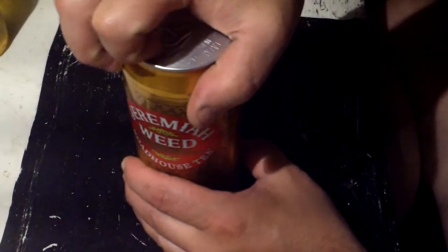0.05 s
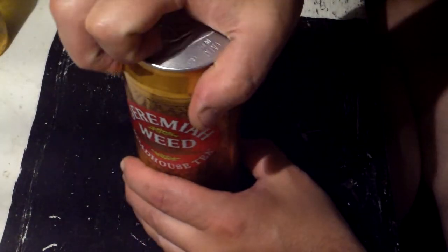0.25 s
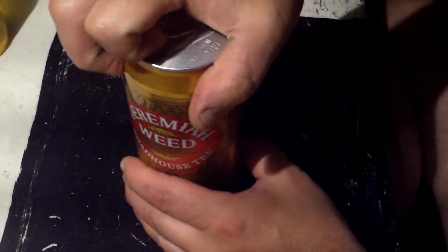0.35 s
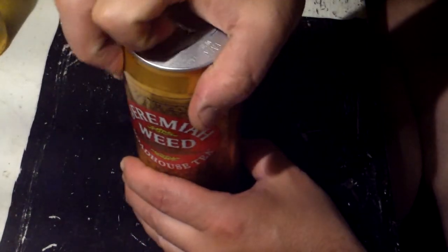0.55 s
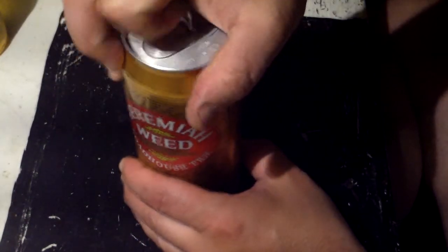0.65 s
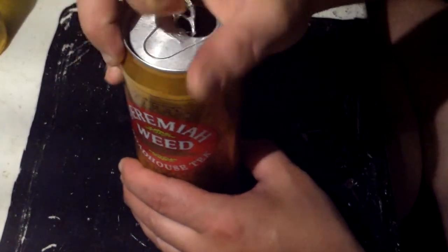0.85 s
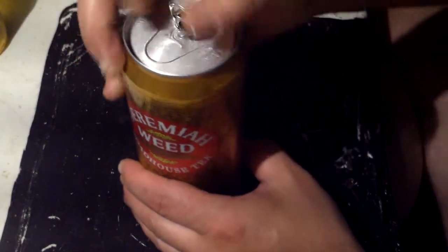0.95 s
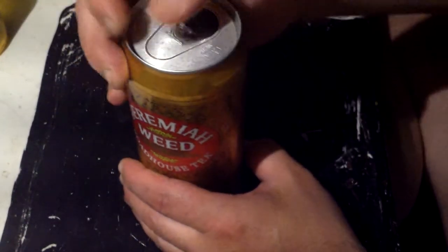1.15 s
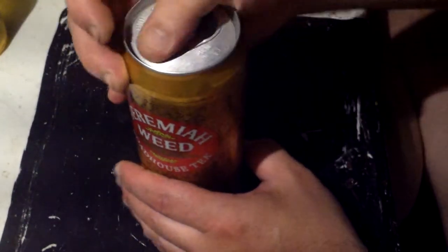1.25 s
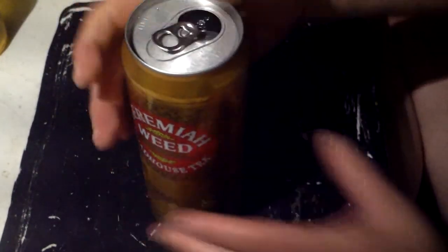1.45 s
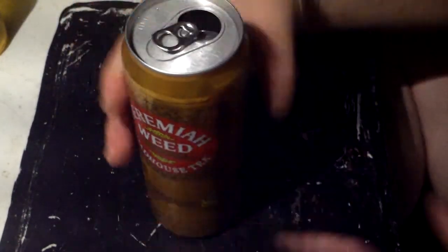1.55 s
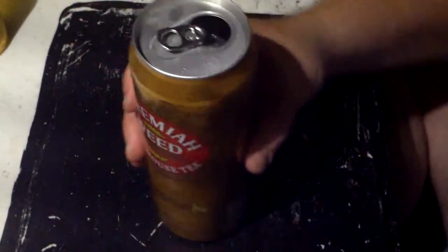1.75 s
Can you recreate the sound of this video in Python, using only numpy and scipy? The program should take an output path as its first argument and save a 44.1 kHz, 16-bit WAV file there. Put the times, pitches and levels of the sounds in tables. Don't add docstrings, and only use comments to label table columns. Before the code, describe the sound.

Drink can being cracked open up close, ring pull clicking, gas hissing briefly, low appliance hum behind

```python
import sys
import numpy as np
from scipy import signal
from scipy.fft import rfft, irfft
from scipy.io import wavfile
from scipy.ndimage import uniform_filter1d

SR = 44100
rng = np.random.default_rng(int(sys.argv[2]) if len(sys.argv) > 2 else 0)


def nominal_scale(level):
    x = np.asarray(level, float) / 20
    return 10 ** x


def file_out(sig):
    cols = np.atleast_2d(sig).T
    lim = np.clip(cols, -1, 1)
    pcm = np.round(lim * 32767).astype(np.int16)
    wavfile.write(sys.argv[1], SR, pcm)


N = 79380

# (frequency [Hz], level [dB], T60 [s])
WALL_MODES = [(6350, -36, .5), (7800, -43, .3)]


def curve(rows, axis=1):
    rows = np.array(rows)
    return np.interp(np.arange(N) / SR, rows[:, 0], rows[:, axis])


def unit(x):
    return x / np.sqrt(np.mean(x ** 2))


def shaped_noise(shape):
    return unit(irfft(rfft(rng.standard_normal(N)) * shape, N))


def bands(rows, sharp=0.94):
    f = np.fft.rfftfreq(N, 1 / SR) + 1
    out = 0
    for hz, width_hz, db in rows:
        detuning = (f - hz ** 2 / f) / width_hz
        out = out + nominal_scale(db) * shaped_noise((1 + detuning ** 2) ** (-sharp / 2))
    return out


def flicker(rate_hz, db):
    k = int(SR / rate_hz)
    wander = uniform_filter1d(uniform_filter1d(rng.standard_normal(N), k), k)
    return nominal_scale(db * unit(wander))


def add(out, s, x):
    i = int(s * SR)
    out[i:i + len(x)] += x[:N - i]


def highpass(x, low_hz):
    return signal.sosfilt(signal.butter(2, low_hz, "high", fs=SR, output="sos"), x)


def strike(blows, modes, low_hz, top_hz=8000, shimmer_db=-20):
    twins, spread_db, detune, phase_spread_rad = 3, 1.5, 0.012, 0.8
    rise_s, snap_s, shimmer_t60_s = 0.00061, 0.00035, 0.09
    out = np.zeros(N)
    t = np.arange(SR // 3) / SR
    hz, db, t60_s = np.repeat(np.array(modes), twins, axis=0).T[:, :, None]
    octaves = np.log2(hz / 4000)
    shimmer_filter = signal.butter(2, (4970, 9000), "band", fs=SR)
    for s, peak_db, tilt_db, snap_db, ring in blows:
        r = rng.standard_normal((3, len(hz), 1))
        tilt = tilt_db * np.minimum(octaves, 0) - max(tilt_db, 0) * np.maximum(octaves, 0)
        gain = nominal_scale(db + tilt + spread_db * r[0])
        mode_hz = hz * (1 + detune * np.minimum(0.118 / t60_s, 1) * r[1])
        phase = 2 * np.pi * mode_hz * t + phase_spread_rad * r[2]
        body = np.sum(gain * np.sin(phase) * 1000. ** (-t / (t60_s * ring)), axis=0)
        swell_s = rise_s * np.clip(-snap_db / 20, .1, 2)
        body = body * np.sin(np.pi / 2 * np.minimum(t / swell_s, 1)) ** 2
        snap_hz = top_hz * nominal_scale(min(tilt_db + 6.5, 0) * 2)
        burst = rng.standard_normal(len(t)) * np.exp(-t / snap_s)
        snap = signal.lfilter(*signal.butter(3, snap_hz, fs=SR), burst)
        shimmer = signal.lfilter(*shimmer_filter, rng.standard_normal(len(t)))
        shimmer = shimmer * 1000. ** (-t / shimmer_t60_s)
        edge = snap / np.max(np.abs(snap)) + nominal_scale(shimmer_db) * shimmer
        add(out, s, nominal_scale(peak_db) * (body / np.max(np.abs(body)) + nominal_scale(snap_db) * edge))
    return highpass(out, low_hz)


def rumble():
    # (frequency [Hz], level [dB per Hz])
    spectrum = [(12, -46), (20, 8), (54, -1.5), (81, -11), (156, -7), (418, -7), (623, -10), (908, -15.5),
                (3000, -22.5), (3900, -70), (6600, -120)]
    f, rows = np.fft.rfftfreq(N, 1 / SR) + 1, np.array(spectrum)
    shape = nominal_scale(np.interp(np.log(f), np.log(rows[:, 0]), rows[:, 1])) / (1 + (f / 3200) ** 8)
    return nominal_scale(-44) * shaped_noise(shape) * flicker(14, 1.5)


def hum():
    # (frequency [Hz], width [Hz], level [dB rms])
    bed = [(64, 42, -53), (118, 15.7, -46.5), (172.8, 4.7, -50), (228, 2.2, -55.5), (590, 100, -53.5)]
    # (frequency [Hz], level [dB])
    lines = [(58.6, -43.5), (108.5, -48), (162, -51.5)]
    t = np.arange(N) / SR
    out = bands(bed)
    for hz, db in lines:
        drift_rad = np.log(flicker(2.4, 19.0))
        out = out + nominal_scale(db - 2.0) * flicker(16.0, 1.8) * np.sin(2 * np.pi * hz * t + drift_rad)
    return out


def whirr():
    # (frequency [Hz], width [Hz], level [dB rms])
    whirr_bands = [(1510, 2200, -54), (3050, 1180, -55.5), (3750, 760, -53), (4280, 670, -48.5),
                   (6310, 260, -70.5), (8100, 400, -74)]
    return bands(whirr_bands, sharp=2.2) * flicker(21.0, 0.61)


def floor():
    # (time [s], recorder gain [dB], whirr level [dB])
    ducking = [(0, -0.5, 0), (.1, -0.5, -0.5), (.225, 0.5, -3), (.235, -8.5, -21), (.35, -9.5, -9.5),
               (.37, -10.5, -10), (.47, -8.5, -9), (.5, -15, -35), (.64, -19.5, -15.5), (.82, -12, -8.5),
               (.9, -20, -10.5), (1.0, -11, -6), (1.2, -6, -10.5), (1.3, -10, -10.5), (1.42, -4, -4),
               (1.57, 1, -1.5), (1.68, 0.5, 1), (1.8, 1, 0.5)]
    gain_db = curve(ducking)
    whirr_db = curve(ducking, axis=2)
    hiss = rng.standard_normal(N) * nominal_scale(-68 + 0.14 * gain_db)
    return (rumble() + hum()) * nominal_scale(gain_db) + whirr() * nominal_scale(whirr_db) + hiss


def ticks():
    slips = [
        (.2268, -10, 0.5, -22, 0.66),
        (.2755, -24, 4, -43, 0.86),
        (.321, -39, -1.5, -46, .7),
        (.3597, -13.5, 6.5, -21, 0.99),
        (.4340, -24, -1, -49, 1),
        (.4400, -24, 0, -44, 1.2),
    ]
    sealed_lid = [(1920, -0.5, 0.027), (1930, -9, 0.015), (2464, -3.5, 0.018), (2770, 4.5, 0.0044),
                  (3620, 10, 0.022), (3950, 1, 0.027), (4430, -4, 0.024), (4670, -8, 0.029),
                  (5020, -14.5, 0.045), (6470, -16.5, 0.027), (7920, -22, 0.015)]
    return strike(slips, sealed_lid, low_hz=1430)


def pierce():
    breach = [(.4745, -10.5, 0, -11, 0.82)]
    vented_lid = [(1970, -3.5, 0.024), (2290, -1, 0.009), (3080, -16, 0.014), (3630, 5.5, 0.008),
                  (4050, 2, 0.017), (4740, -2.5, 0.0098), (5340, -6.5, .01), (6100, -17, .02),
                  (8040, -17, .008)]
    return strike(breach, vented_lid, low_hz=1530, top_hz=12000, shimmer_db=-30)


def vent():
    # (time [s], level [dB])
    flow = [(.484, -72), (.497, -48), (.51, -38.5), (.522, -38), (.55, -39), (.572, -43.5), (.59, -51.5),
            (.603, -66), (.62, -82)]
    # (frequency [Hz], width [Hz], level [dB])
    jet = [(1840, 280, -30), (2800, 320, -15), (4210, 1440, 4.5), (6340, 1300, -15), (8000, 620, -9),
           (10370, 1800, 1), (12300, 1500, -7), (14300, 1700, -5)]
    t = np.arange(N) / SR
    on = (t > flow[0][0]) & (t < flow[-1][0])
    return on * unit(bands(jet, sharp=2.17)) * nominal_scale(curve(flow) + 4) * flicker(150, 1)


def pop():
    relaxing = [(.5388, -13, 0, -11.5, 0.97)]
    dome = [(1848, 6.5, 0.02), (1470, -5, 0.014), (1170, -24, .01), (2560, 0.5, 0.015), (3800, 3.5, 0.0065)]
    return strike(relaxing, dome, low_hz=614, top_hz=3600, shimmer_db=-40)


def first_break():
    fracture = [(.6879, -8, 0, -5.5, 1)]
    bent_lid = [(1520, -43, .006), (2070, -6.5, 0.013), (3010, -5.5, 0.04), (3370, 8, 0.0092),
                (3930, 1, 0.015), (4587, -3.5, 0.034), (5560, -19, 0.028), (6500, -14, 0.0053),
                (7200, -22, 0.009), (7950, -35, 0.014), (9020, -12.5, 0.0086)]
    return strike(fracture, bent_lid, low_hz=750, top_hz=5400, shimmer_db=-29)


def rips():
    steps = [(.7972, -46, 4, -33, .3), (.7996, -26, 8, -24, 0.22), (.8025, -21, 4.1, -13, 0.29),
             (.8040, -20, 4.5, -23, 0.56), (.8103, -21, 11, -32, 0.29), (.8156, -4.5, 3.5, -15, 0.4),
             (.8176, -13, 6, -36, 0.36), (.8190, -9, 8, -30, 0.41), (.8217, -20, 10, -30, 0.25)]
    tearing_lid = [(1990, 3, 0.021), (2730, -5, 0.022), (3680, -8, .022), (3980, 9, 0.028),
                   (4300, 3.5, 0.028), (4600, -9, 0.011), (5600, -21, 0.013), (6400, -18, .02),
                   (8130, -12, 0.064)]
    return strike(steps, tearing_lid, low_hz=1200)


def bumps():
    # (time [s], peak [dB], pitch [Hz], T60 [s])
    thuds = [
        (0.8229, -20.5, 169, 0.013),
        (1.1622, -34, 156, 0.026),
        (1.168, -16, 188, 0.024),
        (1.184, -26, 181.5, 0.051),
        (1.535, -23, 186.5, 0.037),
        (1.5397, -20, 118, 0.052),
        (1.557, -24, 216, 0.032),
    ]
    out, t = np.zeros(N), np.arange(SR // 4) / SR
    for s, db, hz, t60_s in thuds:
        turn = 2 * np.pi * hz * t
        tone = np.sin(turn) + 0.38 * np.sin(1.84 * turn) + 0.12 * np.sin(2.5 * turn)
        add(out, s, nominal_scale(db) * tone * (1 - np.exp(-t / 0.0011)) * 1000. ** (-t / t60_s))
    return highpass(out, 80)


def cracks():
    fractures = [
        (.8246, -8, -6, -42, 1),
        (.8256, -1.5, 4, -6.5, 0.84),
        (.8279, -3.5, 3, -25.5, 0.31),
        (.8313, -30, 11, -27, 0.6),
        (.844, -21, -2, -43, 0.25),
    ]
    torn_lid = [(880, -13.5, 0.024), (1080, -15, 0.0056), (1907, 3.5, 0.02), (2296, -2, 0.037),
                (2812, -3, 0.049), (3730, 1.5, 0.019), (4084, 6.5, 0.015), (4280, -2.5, 0.045),
                (4694, 5.5, 0.026), (5140, -7, 0.017), (5230, -10, 0.026), (6370, -4, 0.029),
                (8100, -13, 0.032), (8850, -38, 0.015)]
    return strike(fractures, torn_lid + WALL_MODES, low_hz=446, top_hz=10800, shimmer_db=-30)


def knocks():
    touches = [
        (1.0535, -33.5, 7, -31, 0.82),
        (1.1098, -28, -9, -16, 0.37),
        (1.1675, -39, 2.5, -16, 2.6),
        (1.537, -31, -7, -23, 3.4),
    ]
    hollow_can = [(583, 2.5, 0.023), (992, 7, 0.026), (1425, -0.5, .015), (1644, 2.5, 0.015),
                  (2270, 0, 0.021), (2900, -19, 0.018)]
    return strike(touches, hollow_can, low_hz=248, top_hz=2470, shimmer_db=-50)


def taps():
    touches = [
        (1.172, -40.5, 14, -28, 0.7),
        (1.3817, -21, 0.5, -7, 0.89),
        (1.3832, -24.5, 6, -28, 1.5),
    ]
    open_lid = [(997, 8.5, 0.034), (1520, 8.5, 0.011), (1680, -5, 0.025), (2250, -2, 0.016),
                (2860, 1.5, 0.062), (3130, -1.5, 0.023), (3570, 3.5, .025), (4080, 7.5, 0.014),
                (5060, 4.5, 0.012), (6220, -5, 0.015), (6600, -14, .015), (7580, -3, 0.024),
                (7800, -6, 0.024), (8500, -18, .015)]
    return strike(touches, open_lid + WALL_MODES, low_hz=605, top_hz=10900, shimmer_db=-19)


def scuff():
    # (time [s], level [dB])
    scrape = [(1.515, -72), (1.524, -49), (1.531, -50.5), (1.542, -57), (1.57, -59)]
    t = np.arange(N) / SR
    on = (t > scrape[0][0]) & (t < scrape[-1][0])
    grain = bands([(4000, 1400, 7.0), (1780, 5200, 7), (7700, 2100, -12)], sharp=3.55)
    return on * grain * nominal_scale(curve(scrape))


def echo(x):
    level_db, t60_s, gap_s, low_hz, top_hz = -18.5, 0.24, 0.0012, 895, 5970
    t = np.arange(SR // 2) / SR
    tail = rng.standard_normal(len(t)) * 1000. ** (-t / t60_s) * np.clip(t / gap_s, 0, 1)
    tail = signal.sosfilt(signal.butter(1, [low_hz, top_hz], "band", fs=SR, output="sos"), tail)
    return nominal_scale(level_db) * signal.fftconvolve(x, tail / np.sqrt(np.sum(tail ** 2)))[:N]


def scene():
    clicks = ticks() + pierce() + pop() + first_break() + rips() + cracks() + knocks() + taps()
    noises = vent() + scuff()
    scattered = clicks * unit(flicker(900, 7))
    steady = floor() + noises + bumps() + echo(scattered + noises)
    steady_top = signal.ellip(10, .2, 40, 15720, fs=SR, output="sos")
    return (clicks + signal.sosfilt(steady_top, steady))[None, :]


def roll_off(x):
    return signal.sosfilt(signal.butter(12, 16660, fs=SR, output="sos"), x)


def record(dry):
    ceiling, top_hz = 0.85, 16450
    soft = ceiling * np.tanh(dry / ceiling)
    mix = signal.sosfilt(signal.ellip(7, .2, 60, top_hz, fs=SR, output="sos"), soft)
    return roll_off(mix)


dry = scene()
out = record(dry)
file_out(out)
```